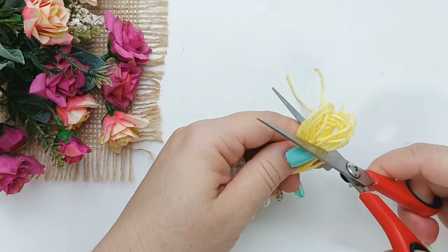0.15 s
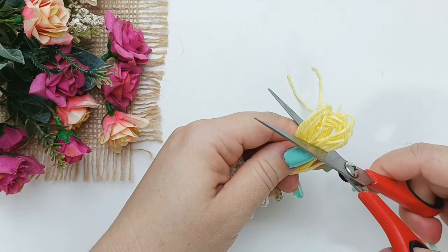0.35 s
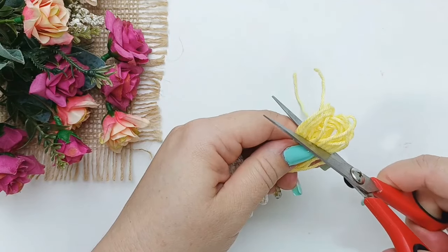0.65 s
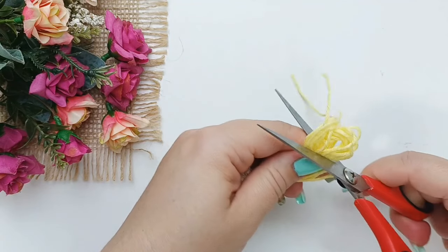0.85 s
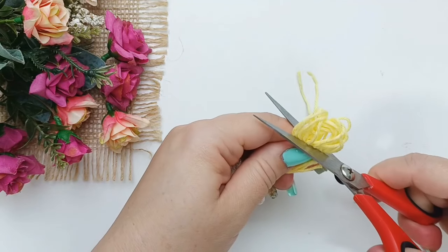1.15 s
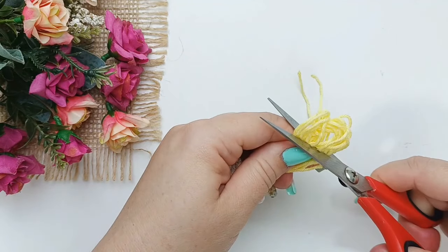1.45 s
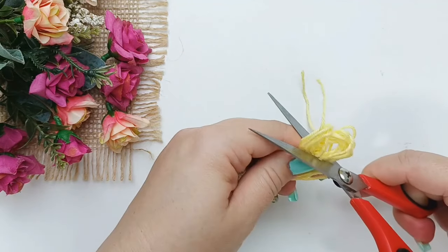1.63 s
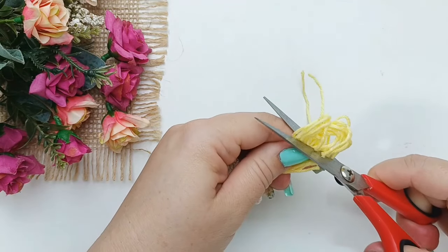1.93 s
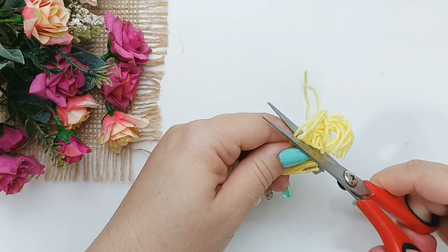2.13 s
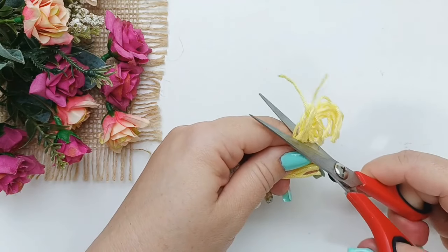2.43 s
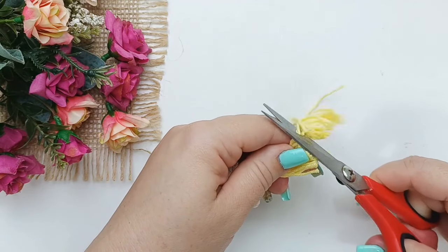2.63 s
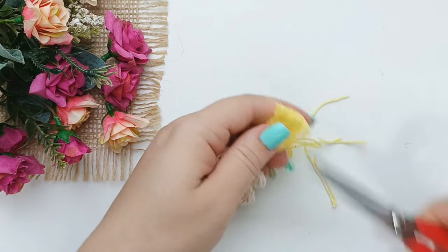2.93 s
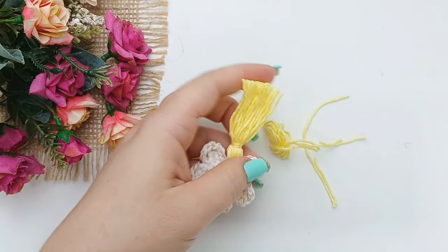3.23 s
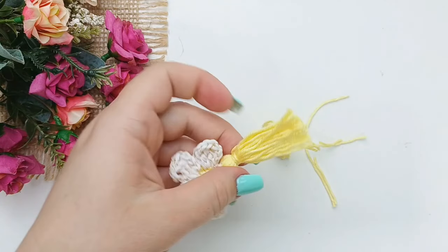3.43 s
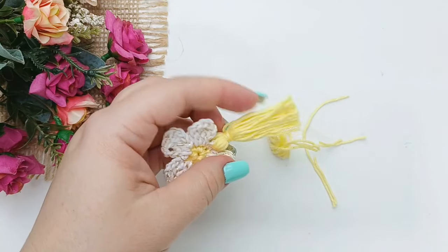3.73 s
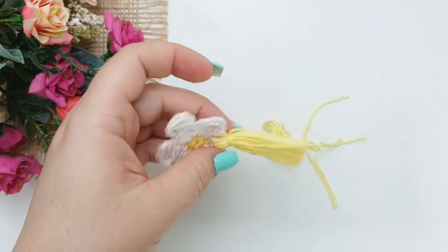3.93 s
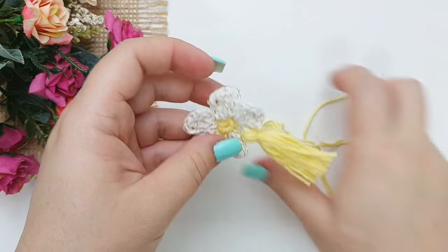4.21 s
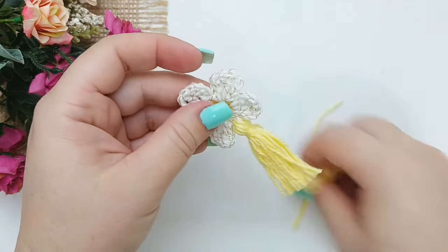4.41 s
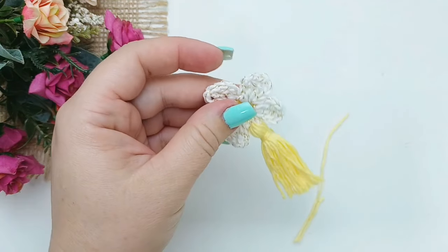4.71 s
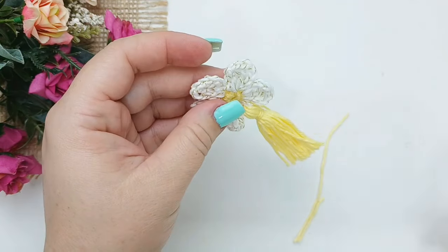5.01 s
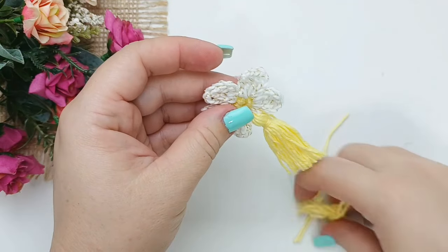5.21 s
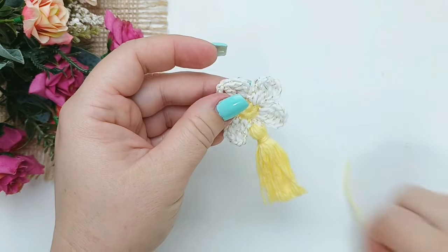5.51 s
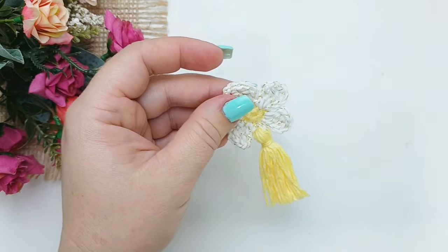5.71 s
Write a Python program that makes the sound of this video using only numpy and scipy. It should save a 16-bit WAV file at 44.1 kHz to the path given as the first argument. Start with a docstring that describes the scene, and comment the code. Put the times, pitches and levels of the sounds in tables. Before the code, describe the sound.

Scissors snip through a yarn tassel in four crisp crunching cuts, then clunk onto a table, followed by hand thumps sweeping up offcuts.

```python
"""Small scissors cut a tassel of yarn in four strokes, close to a phone above a craft table in a quiet room.
The blades rub and bunches of fibres snap: bursts of noise that ring the steel and shake the handles.
Then nails click, and the scissors are put down: blows that make the board thud and ring, and the steel clink.
Last, a hand lands three times to sweep up the offcuts; skin rubs and yarn rustles as shaped, coloured noise.
Low rumble, faint hiss and an appliance hum, made of two wavering tones, last throughout."""
import sys
import numpy as np
from scipy import signal
from scipy.fft import rfft, irfft
from scipy.io import wavfile
from scipy.ndimage import uniform_filter1d

SR = 44100
rng = np.random.default_rng(int(sys.argv[2]) if len(sys.argv) > 2 else 0)


def unload_audio(sound):
    """Save the sound as a 16-bit wav file, at the path given as the first command line argument."""
    columns = np.transpose(np.atleast_2d(sound))
    # keep every value between -1 and 1, then stretch to whole-number steps
    steps = np.round(np.clip(columns, -1, 1) * 32767)
    wavfile.write(sys.argv[1], SR, steps.astype(np.int16))


N = 258108
T = np.arange(N) / SR  # time in seconds
TAIL = T[:SR]  # the one second in which a ring or echo dies away

# Bunches of fibres parting between the blades. Each row: start in seconds, length in seconds, level in dB.
FIBRE_SNAPS = [(0.368, 0.0036, -67), (0.417, 0.0024, -60), (.451, 0.0072, -56), (0.477, 0.0072, -57.5),
               (0.558, 0.0059, -49), (.976, .008, -67), (1.016, 0.0037, -64.5), (1.079, 0.013, -55.5),
               (1.104, .013, -57), (1.145, .02, -48.5), (1.211, 0.0061, -53.5), (1.222, 0.022, -51),
               (1.692, 0.0064, -61.5), (1.898, 0.016, -56), (1.934, 0.0093, -54), (1.942, .0068, -43.5),
               (1.970, 0.0047, -46.5), (2.461, 0.0069, -68), (2.573, 0.015, -47.5), (2.59, 0.011, -50.5)]
# Squeezes that slide blade over blade. Each row: start in seconds, length in seconds, final level in dB.
BLADE_SQUEEZES = [(.37, 0.24, -67), (1.05, 0.065, -57.5), (1.14, 0.12, -66), (1.69, 0.14, -58.5),
                  (1.9, 0.063, -52.5), (2.45, 0.13, -67)]
# friction grows by PRESS_DB over a squeeze
PRESS_DB, SQUEEZE_ATTACK_S, SQUEEZE_RELEASE_S = 8, 0.0068, 0.016
# The blades sliding open again. Each row: start in seconds, length in seconds, level in dB.
BLADE_OPENINGS = [(.78, 0.053, -72.5), (1.52, 0.058, -76)]
# Colour of the cut. Each row: pitch in Hz, relative level in dB.
CUT_COLOUR = [(300, -38), (1500, -26), (2050, -11), (2550, -8), (3200, 0), (4200, -7), (5300, -15),
              (7300, -11), (8300, -2), (10700, 1), (13000, -1), (16000, -5)]
# Ringing of the steel blades. Each row: pitch in Hz, relative level in dB, seconds to fade by 60 dB.
BLADE_MODES = [(2130, -9, .025), (3360, -5, .025), (8820, -2, .028), (9720, -1, .03), (10650, 0, .035),
               (12600, -6, .02), (13200, -7, .025)]
# Colour of the shaken handles. Each row: pitch in Hz, relative level in dB.
HANDLE_COLOUR = [(150, -12), (350, 1), (520, 0), (680, 3), (1100, -11), (1550, -6), (1750, -10), (2080, 1),
                 (2600, -9), (5000, -9), (8000, -22)]
# As the tassel thins, each bite shakes the handles more, up to the last strands.
CUT_THROUGH_S, HANDLE_DB, HANDLE_RISE_DB_PER_S = 2.7, -8, 12

# Blows on the tabletop. Each row: time in seconds, relative thud level in dB, relative ring level in dB,
# contact cut-off in Hz, relative level of the sharp tick in dB.
TABLE_KNOCKS = [(3.6252, -28.5, -41.5, 1550, -26.5), (3.6687, -29.5, -41.5, 1440, -36),
                (3.742, -52, -47, 3500, -67), (3.799, -49, -57, 1500, -47),
                (3.8058, -25.5, -25.5, 1880, -46), (3.8130, -24, -45.5, 2430, -36),
                (3.8250, -29, -34.5, 1930, -62), (3.8349, -24.5, -30, 2520, -62),
                (4.3142, -23.5, -39.5, 1160, -44), (5.2238, -39.5, -43.5, 980, -53),
                (5.231, -38, -45.5, 4020, -65), (5.811, -52, -47.5, 1490, -39)]
# Soft pushes that flex the whole board. Each row: time in seconds, relative level in dB.
BOARD_PUSHES = [(3.813, -29), (5.228, -40.5), (5.815, -27.5), (5.841, -28.5)]
# Quick thud under a blow. Each row: pitch in Hz, relative level in dB, seconds to fade by 60 dB.
THUD_MODES = [(99, -25, 0.053), (125.4, -11, 0.17), (262, 0.5, 0.049), (470, -23, 0.024),
              (736, -5.5, 0.014)]
# Lasting ring of board and room. Each row: pitch in Hz, relative level in dB, seconds to fade by 60 dB.
RING_MODES = [(116.9, -2.5, 0.4), (160, -13, 0.39), (264.5, -10, 0.95), (334, -1.5, 0.6),
              (418.5, 5.5, 0.11), (461, -17, 0.69), (588, -2.5, 0.29), (644, -16, 0.35), (653, -7, 0.69),
              (635, -11, 0.38), (797, -16, 1), (811, -15.5, 0.5), (912, -19, 1), (900, -16, 0.74),
              (1060, -18.5, 0.31), (1274, -11.5, 0.57), (1680, -32, 0.29)]
# Colour of the board's dense upper modes. Each row: pitch in Hz, relative level in dB.
CLATTER_COLOUR = [(100, -7), (300, 1), (700, 2.5), (1100, -5.5), (1500, -7), (2200, -9), (3500, -12),
                  (5500, -15), (8000, -18.5), (15000, -29)]
# Colour of a hard tick. Each row: pitch in Hz, relative level in dB.
TICK_COLOUR = [(800, 2), (3000, 4.5), (5000, -6), (6200, 7.5), (7200, -4.5), (8200, 16.5), (10000, 6),
               (13000, 12.5), (16000, -12)]
# Fingernail clicks. Each row: time in seconds, relative level in dB.
NAIL_CLICKS = [(2.987, -56.5), (3.351, -58), (3.38, -50), (3.5006, -48), (5.2277, -48)]
# The scissors touching down. Each row: time in seconds, relative level in dB.
STEEL_CLINKS = [(3.6248, -53), (3.6685, -49), (3.813, -63)]
# Free ring of the scissors' steel. Each row: pitch in Hz, relative level in dB, seconds to fade by 60 dB.
STEEL_MODES = [(674, 4, 0.17), (708, 5, 0.16), (1250, -4, 0.067), (3180, -2, .06), (8200, -38, .2),
               (8150, -2, 0.2), (8300, -3, 0.14), (12700, -3, .05)]

# Skin slapping the top as the hand lands. Each row: time in seconds, level in dB.
HAND_SLAPS = [(4.3150, -9), (5.2260, -23), (5.231, -33)]
# Colour of the slap. Each row: pitch in Hz, relative level in dB.
PALM_COLOUR = [(100, -11), (270, 7.5), (440, -0.5), (520, -8.5), (660, -7), (950, 2.5), (1200, -23.5),
               (2200, -23), (5600, -9), (7400, -22), (8500, -17), (15000, -53)]
# Wipes of the hand across the table. Each row: start in seconds, length in seconds, level in dB.
HAND_WIPES = [(4.25, 0.0082, -52.5), (4.312, .075, -41.5), (5.222, .01, -43), (5.24, 0.069, -57),
              (5.432, 0.023, -61.5), (5.67, 0.037, -68.5), (5.806, 0.029, -53.5)]
WIPE_ATTACK_S, WIPE_RELEASE_S = 0.0062, 0.014
# Colour of skin sweeping the top. Each row: pitch in Hz, relative level in dB.
SKIN_COLOUR = [(150, 3), (400, 2.5), (900, -4), (1400, -4.5), (2250, 3), (3000, 2), (4500, -2), (6000, -7),
               (7400, -12.5), (8500, -12.5), (11000, -17.5), (15500, -24.5)]
# Yarn handled between the fingers. Each row: start in seconds, length in seconds, level in dB.
YARN_RUSTLES = [(3.29, 0.23, -77), (3.67, 0.063, -61.5), (4.221, 0.13, -60.5), (4.57, 0.08, -76),
                (4.85, 0.024, -79.5), (5.4, .25, -72), (5.66, .19, -66.5)]
RUSTLE_ATTACK_S, RUSTLE_RELEASE_S = 0.0084, 0.031
# Colour of rustling yarn. Each row: pitch in Hz, relative level in dB.
YARN_COLOUR = [(500, -8.5), (1000, 1.5), (1400, 3.5), (2100, -4.5), (2900, 3.5), (4200, -4.5), (9000, -7),
               (15000, -11)]

# Colour of the room air. Each row: pitch in Hz, relative level in dB.
AIR_COLOUR = [(20, -20.5), (40, -8.5), (60, -2.5), (100, -1.5), (150, -7), (260, -5), (400, -15.5),
              (650, -20), (1200, -23), (2200, -27.5), (3000, -25), (4000, -31.5), (9000, -27), (16000, -27)]
# The low rumble swells while the tassel is turned and the table cleared.
# Each row: start in seconds, length in seconds, level of the extra rumble in dB against the steady rumble.
EXTRA_RUMBLE = [(2.85, 1.72, -5)]
RUMBLE_GAIN_DB = 0.5
# Loudness of the appliance's upper hum. Each row: time in seconds, level in dB.
HUM_LEVEL = [(0, -72), (.8, -63.5), (1.2, -65.5), (1.35, -72), (2.8, -72.5), (3, -67), (4.2, -71.5),
             (5.8, -73)]
# How fast echoes die in the room. Each row: pitch in Hz, seconds to fade by 60 dB.
ROOM_DECAY = [(80, 0.43), (210, 0.59), (560, 0.49), (1500, 0.51), (4000, 0.36), (10000, 0.26), (16000, 0.3)]
TOP_HZ = 15900  # the phone passes nothing much above this


def amp(db):
    """Turn decibels into a gain."""
    return 10 ** (np.asarray(db) / 20)


def curve(rows):
    """Gain over time from rows of seconds and dB."""
    return amp(np.interp(T, *np.transpose(rows)))


def over_pitch(rows, hz):
    """Read rows of Hz and value at any pitch, in equal steps per octave."""
    points, values = np.transpose(rows)
    return np.interp(np.log(np.maximum(hz, 1)), np.log(points), values)


def unit(response):
    """Scale each channel of a response to unit energy."""
    return response / np.sqrt(np.sum(response ** 2, axis=-1, keepdims=True))


def through(x, response):
    """Pass a sound through a mono or stereo response."""
    full = signal.fftconvolve(np.atleast_2d(x), np.atleast_2d(response), axes=-1)
    return full[:, :np.shape(x)[-1]]


def colour(rows, size=4096):
    """A short response with the given spectrum and unit energy, packed towards its start."""
    gains = amp(over_pitch(rows, np.fft.rfftfreq(size, 1 / SR)))
    # folding the log spectrum's transform forward in time leaves nothing before the start
    cepstrum = irfft(np.log(gains))
    cepstrum[1:size // 2] *= 2
    cepstrum[size // 2 + 1:] = 0
    return unit(irfft(np.exp(rfft(cepstrum))))


def fade(t60):
    """Steady dying away, by 60 dB in t60 seconds."""
    return np.exp(-np.log(1000) * TAIL / t60)


def modes(rows, lead_s=0):
    """A struck object rings as a sum of fading tones."""
    return sum(amp(db) * fade(t60) * np.sin(2 * np.pi * hz * (TAIL + lead_s)) for hz, db, t60 in rows)


def blows(rows):
    """One single-sample blow for each row of seconds and dB."""
    force = np.zeros(N)
    for s, db in rows:
        force[int(s * SR)] += amp(db)
    return force


def crackle(scatter_db):
    """Rubbing is dense tiny slips of very unequal size; their overall level is 1."""
    sizes = amp(scatter_db * np.minimum(rng.exponential(size=N), 5))
    slips = rng.standard_normal(N) * sizes
    return slips / slips.std()


def motions(rows, attack_s, release_s, growth_db=0):
    """Gain of rubbing motions: each sets in, grows to its level as it goes on, and dies away."""
    gain = np.zeros(N)
    for s, length, db in rows:
        onset = np.clip((T - s) / attack_s, 0, 1)
        left = np.clip(1 - (T - s) / length, 0, 1)  # share of the motion still to come
        release = np.exp(-np.clip((T - s - length) / release_s, 0, 20))
        gain += onset * amp(db - growth_db * left) * release
    return gain


def glance(x, spread_s, count=48):
    """Sound glances off hands and table: each pitch gets its own small delay per side, its colour kept."""
    hz = np.fft.rfftfreq(SR, 1 / SR)
    delays = spread_s * (.5 + rng.exponential(size=(2, count)))
    lags = [np.interp(hz, np.linspace(0, hz[-1], count), row) for row in delays]
    response = irfft(np.exp(-2j * np.pi * np.cumsum(lags, axis=1)), SR)
    return through(x, unit(response[:, :SR // 20]))


def diffuse(size, apart_hz=750):
    """Noise from all sides: nearly alike on both sides in the bass, unrelated in the treble."""
    mid, side = rfft(rng.standard_normal((2, size)))
    width = np.clip(np.fft.rfftfreq(size, 1 / SR) / apart_hz, .15, 1)
    both = np.array([mid + width * side, mid - width * side])
    return irfft(both / np.sqrt(1 + width ** 2), size)


def reverb():
    """The room's echoes blur into noise whose octave bands each die at their own rate."""
    noise, hz = rfft(diffuse(SR)), np.fft.rfftfreq(SR, 1 / SR)
    centres = np.geomspace(32, 16384, 10)
    tail = 0
    for centre, row in zip(centres, np.eye(len(centres))):
        share = over_pitch(np.c_[centres, row], hz)  # how much of each pitch this band takes
        tail = tail + irfft(noise * share, SR) * fade(over_pitch(ROOM_DECAY, centre))
    return unit(tail)


def room(x, early_db, wet_db, pan_db, left_late=0):
    """Direct sound, left_late samples later on the left, then scatter off the table and the room's tail."""
    early = unit(diffuse(SR) * fade(.008))
    late = unit(reverb() * (1 - fade(0.027)))
    response = amp(early_db) * early + amp(wet_db) * late
    response[0, left_late] += 1
    response[1, 0] += 1
    sides = amp([[pan_db / 2], [-pan_db / 2]])  # a positive pan favours the left
    return through(x, unit(response)) * sides


def snapping():
    """Each bunch of fibres parts in a short burst with rounded ends."""
    bite = np.zeros(N)
    for s, length, db in FIBRE_SNAPS:
        place = 2 * (T - s) / length - 1  # -1 at the start, 1 at the end
        bite += amp(db) * np.exp(-place ** 4 / 2)
    return bite


def blade_friction():
    """Blades rub as they close and open; the edges catch and slip every few milliseconds."""
    closing = motions(BLADE_SQUEEZES, SQUEEZE_ATTACK_S, SQUEEZE_RELEASE_S, PRESS_DB)
    opening = motions(BLADE_OPENINGS, attack_s=0.023, release_s=.02)
    steps = np.repeat(rng.standard_normal(N // 128 + 1), 128)
    catching = uniform_filter1d(steps, 64)[:N]
    return (closing + opening) * amp(3.5 * catching)


def scissors():
    """Friction and snapping fibres ring the steel; later bites also shake the handles more."""
    bite = snapping()
    effort = np.hypot(bite, blade_friction())
    crunch = through(effort * crackle(scatter_db=2.5), colour(CUT_COLOUR))
    steel = amp(-8) * through(effort * crackle(scatter_db=3), unit(modes(BLADE_MODES)))
    shake = bite * amp(HANDLE_DB - HANDLE_RISE_DB_PER_S * np.maximum(CUT_THROUGH_S - T, 0))
    handles = through(shake * crackle(scatter_db=1.0), colour(HANDLE_COLOUR))
    cut = room(glance(crunch + steel, spread_s=.0004), early_db=-18, wet_db=-8, pan_db=-.8)
    return cut + room(handles, early_db=4, wet_db=-0.5, pan_db=7)


def board_thud():
    """Blows excite quickly fading low tones, and soft pushes flex the whole board."""
    thud = through(blows([row[:2] for row in TABLE_KNOCKS]), -modes(THUD_MODES))
    flex = through(blows(BOARD_PUSHES), -modes([(79.0, -4.0, 0.2), (149.9, -13.0, 0.41)]))
    return room(thud + flex, early_db=-10, wet_db=-4.0, pan_db=0.0, left_late=6)


def board_ring():
    """Blows set the board ringing and clattering; softer contact takes the top off the ring."""
    push = np.zeros(N)
    for s, _, ring_db, contact_hz, _ in TABLE_KNOCKS:
        softness = signal.butter(2, contact_hz, fs=SR, output="sos")
        push += signal.sosfilt(softness, blows([(s, ring_db)]))
    # the standing waves reach the two sides at slightly different times
    sides = np.array([modes(RING_MODES, lead_s=-0.00019), modes(RING_MODES, lead_s=0.000056)])
    ring = amp(-10.5) * through(push, sides)
    # the upper modes lie so close together that they sound like fading noise
    dense = unit(reverb() + amp(-12.5) * unit(diffuse(SR) * fade(0.13)))
    clatter = amp(28.5) * through(through(push, colour(CLATTER_COLOUR)), dense)
    return clatter - ring


def ticks():
    """Hard touches on the table and fingernails crack: noise that fades in a few milliseconds."""
    crack = through(rng.standard_normal(SR) * fade(.007), colour(TICK_COLOUR))
    table = through(blows([(row[0], row[-1]) for row in TABLE_KNOCKS]), crack)
    nails = through(blows(NAIL_CLICKS), crack)
    table_in_room = room(table, early_db=16, wet_db=16.5, pan_db=-3.0)
    return table_in_room + room(nails, early_db=0, wet_db=-6, pan_db=0)


def clinks():
    """The scissors' steel rings on briefly as they touch down."""
    clink = through(blows(STEEL_CLINKS), modes(STEEL_MODES))
    return room(clink, early_db=21.5, wet_db=14, pan_db=6.5)


def slaps():
    """The landing palm slaps the table with one short, coloured blow."""
    slap = through(blows(HAND_SLAPS), colour(PALM_COLOUR))
    return room(slap, early_db=9, wet_db=2.5, pan_db=-2.5, left_late=1)


def rubbing():
    """Skin sticks and slips across the table, and yarn rustles between the fingers."""
    slips = motions(HAND_WIPES, WIPE_ATTACK_S, WIPE_RELEASE_S) * crackle(scatter_db=3)
    skin = through(slips, colour(SKIN_COLOUR))
    strands = motions(YARN_RUSTLES, RUSTLE_ATTACK_S, RUSTLE_RELEASE_S) * crackle(scatter_db=5.5)
    yarn = through(strands, colour(YARN_COLOUR))
    return room(glance(skin + yarn, spread_s=0.000521), early_db=-17, wet_db=-4.5, pan_db=0)


def appliance_hum():
    """Two faint tones waver slowly in pitch together; the upper one also swells and sinks."""
    drift = np.interp(T, np.linspace(0, T[-1], 40), rng.standard_normal(40))
    upper = np.sin(2 * np.pi * np.cumsum(208.8 + .9 * drift) / SR)
    lower = np.sin(2 * np.pi * np.cumsum(119 + 1.2 * drift) / SR)
    return curve(HUM_LEVEL) * np.sqrt(2) * upper + amp(-79.5) * lower


def room_air():
    """Coloured noise from all sides: a low rumble that swells once, and a steady faint hiss."""
    air = amp(-70.0) * through(diffuse(N), colour(AIR_COLOUR))
    rumble = signal.sosfiltfilt(signal.butter(2, 500, fs=SR, output="sos"), air)
    hiss = air - rumble
    swell = 1 + motions(EXTRA_RUMBLE, attack_s=.02, release_s=.15)
    return amp(RUMBLE_GAIN_DB) * swell * rumble + hiss


def scene():
    """Everything on and around the table, added up."""
    table = board_thud() + board_ring() + ticks() + clinks()
    hand = slaps() + rubbing()
    return scissors() + table + hand + appliance_hum() + room_air()


def record(dry):
    """The phone drops the deepest bass and cuts the top."""
    lean = signal.sosfilt(signal.butter(4, 44, "high", fs=SR, output="sos"), dry)
    return signal.sosfilt(signal.ellip(10, .2, 80, TOP_HZ, fs=SR, output="sos"), lean)


dry = scene()
out = record(dry)
unload_audio(out)
```